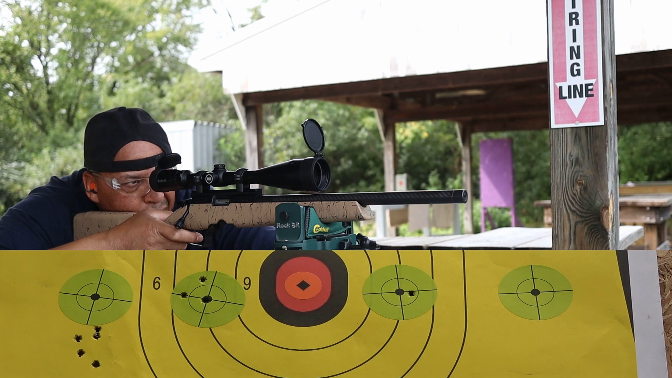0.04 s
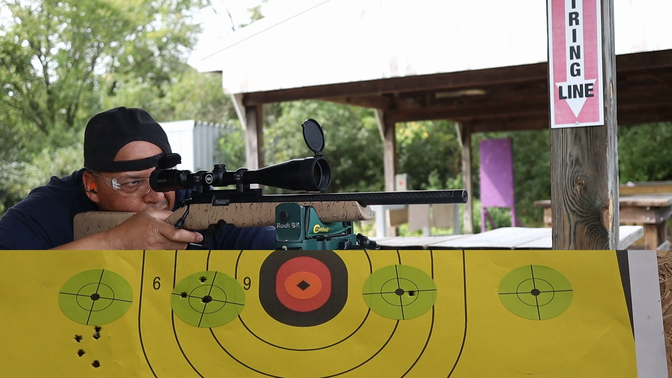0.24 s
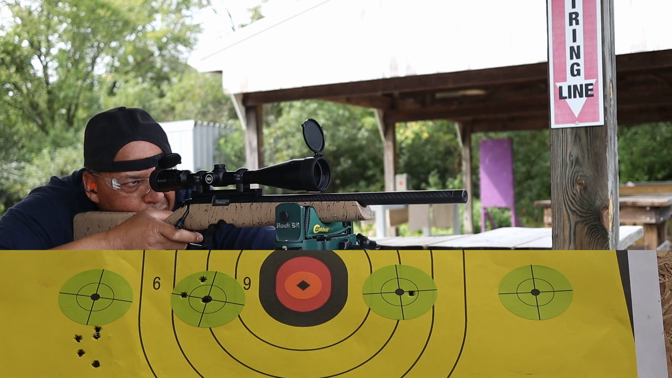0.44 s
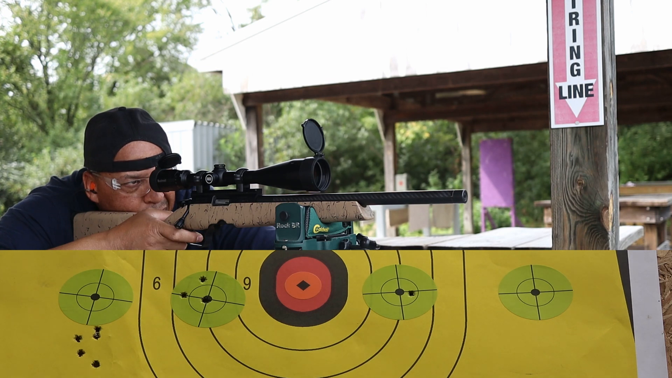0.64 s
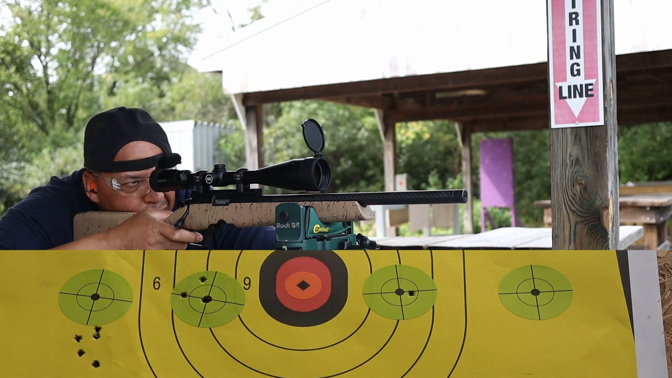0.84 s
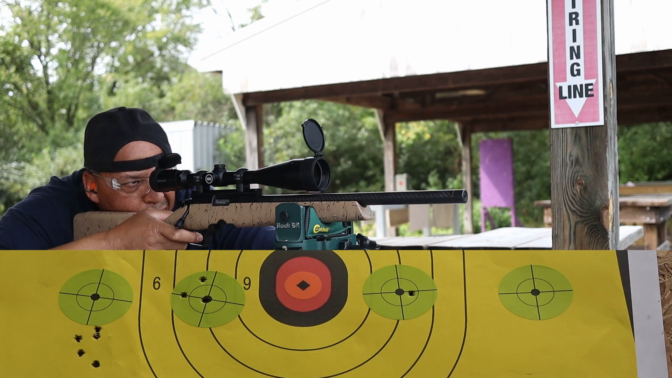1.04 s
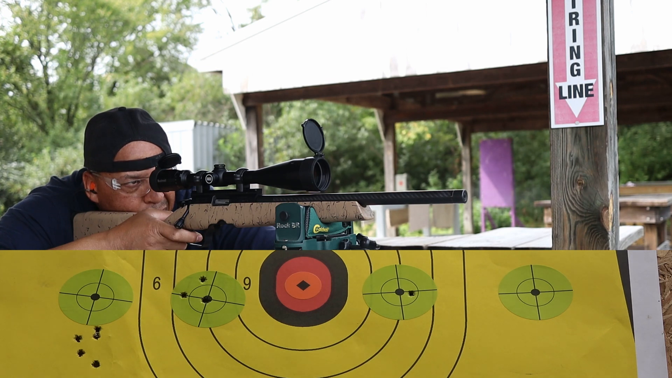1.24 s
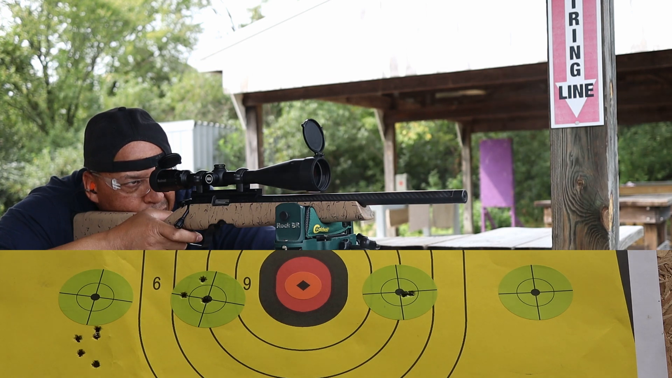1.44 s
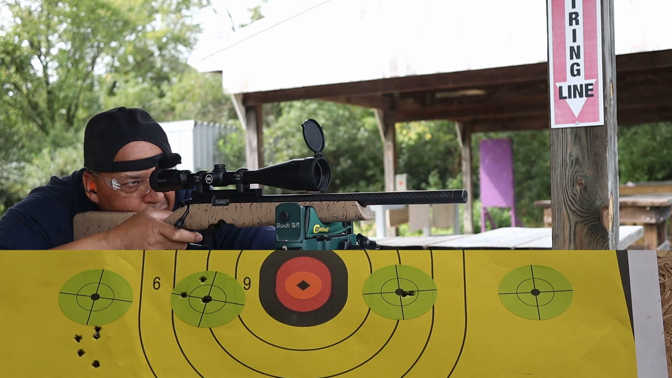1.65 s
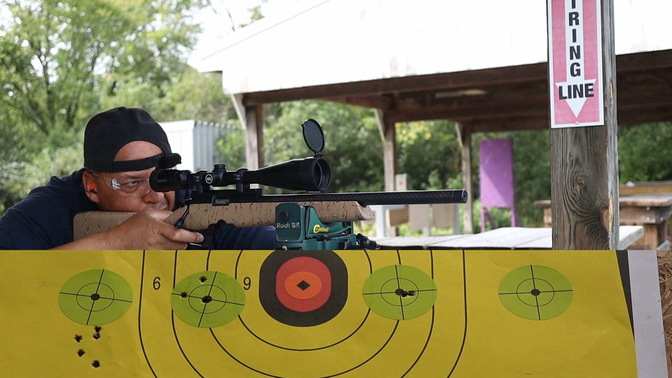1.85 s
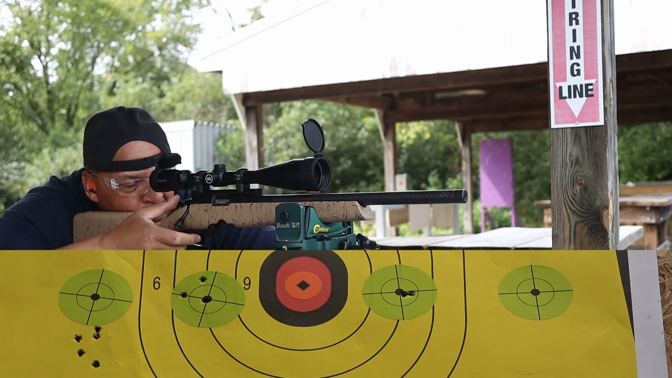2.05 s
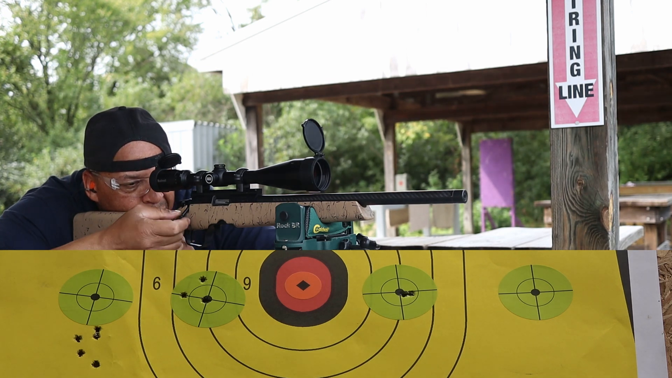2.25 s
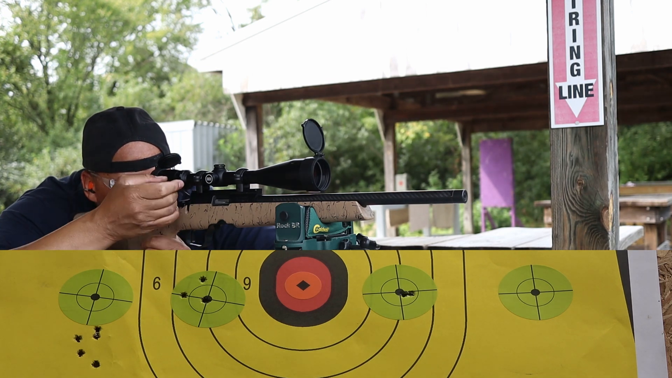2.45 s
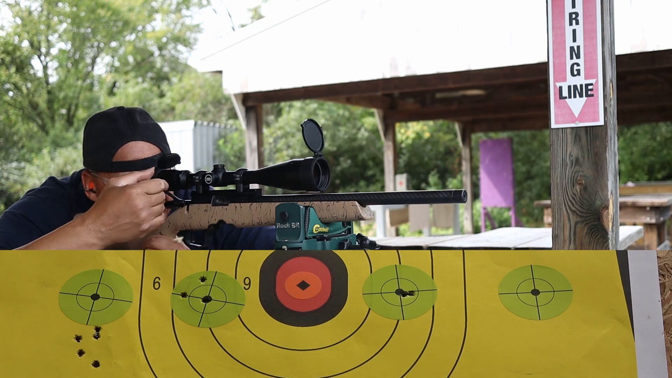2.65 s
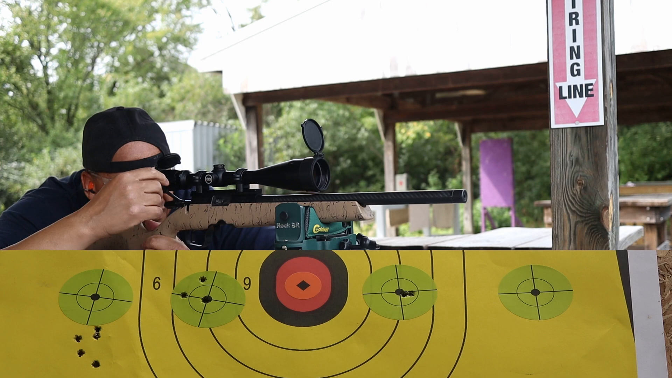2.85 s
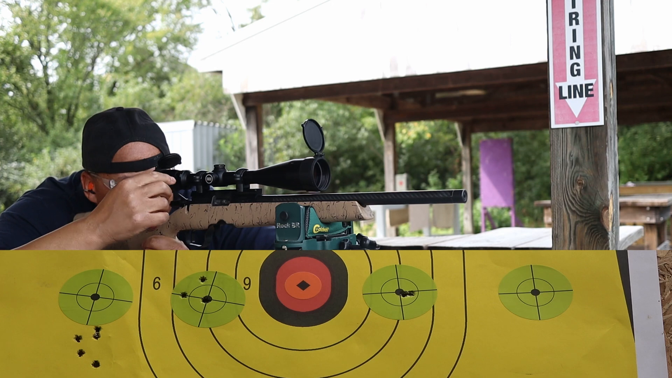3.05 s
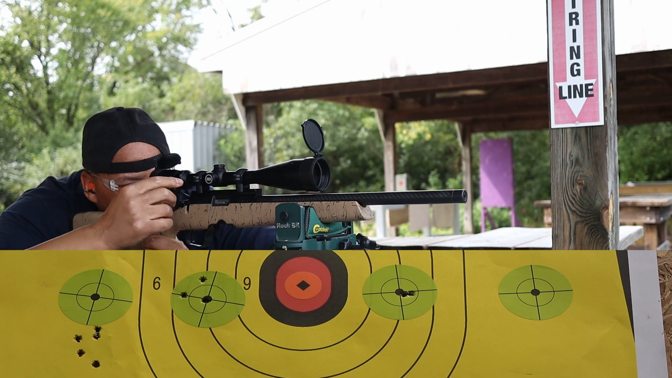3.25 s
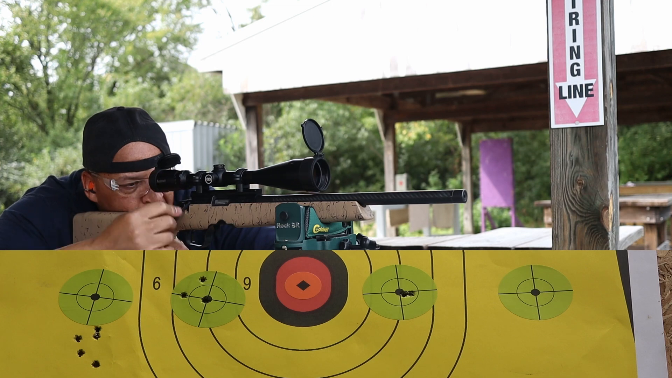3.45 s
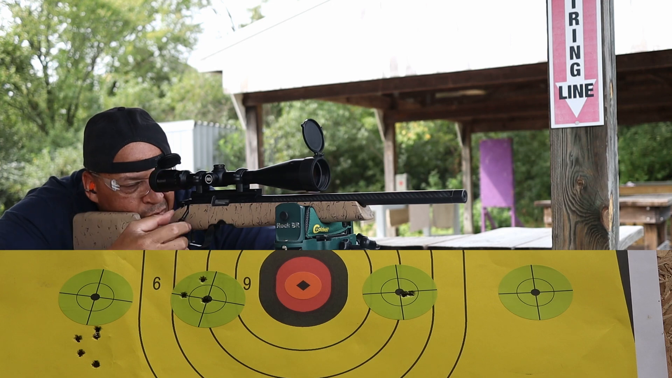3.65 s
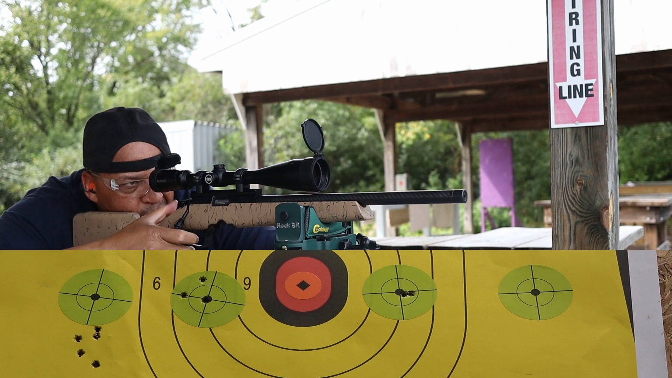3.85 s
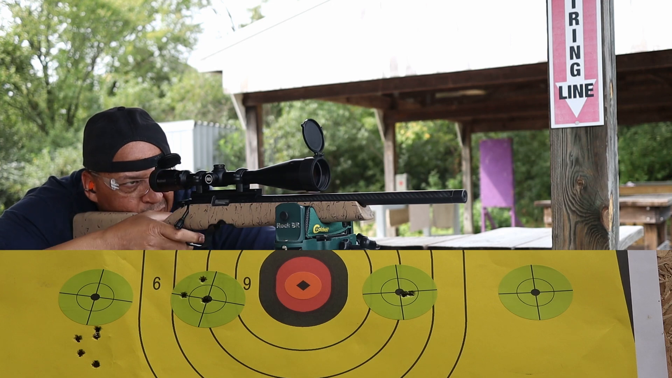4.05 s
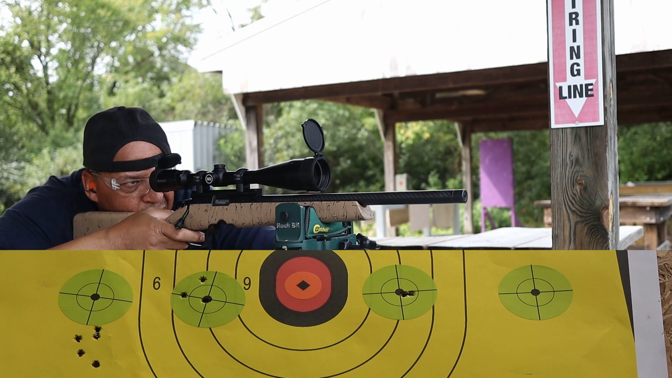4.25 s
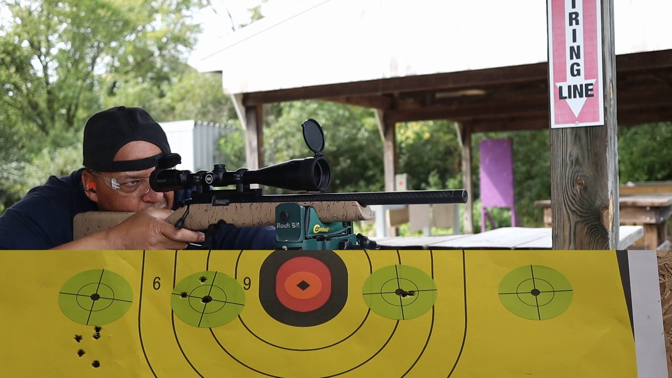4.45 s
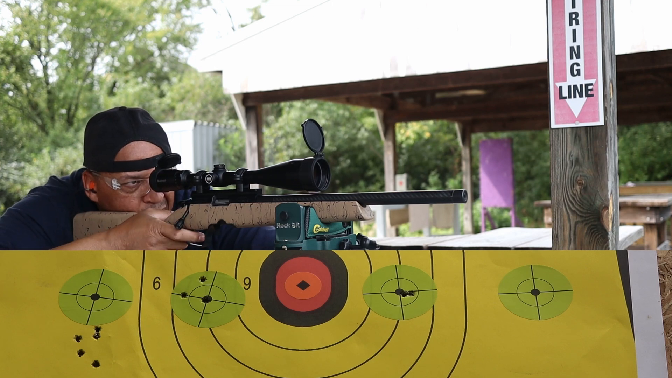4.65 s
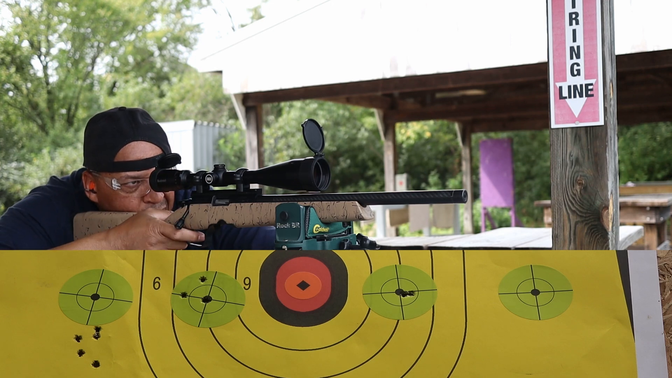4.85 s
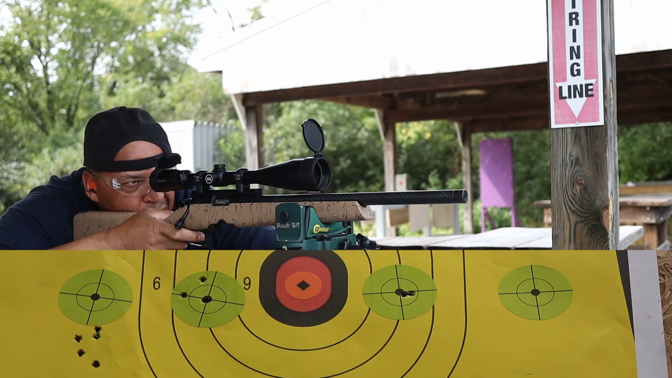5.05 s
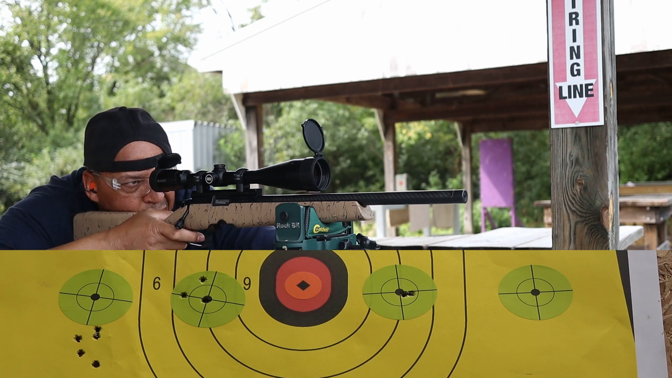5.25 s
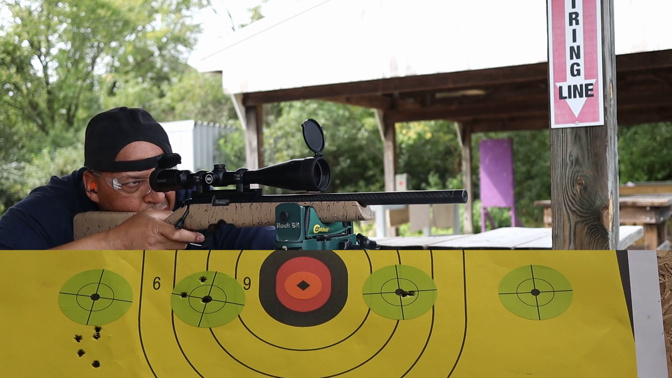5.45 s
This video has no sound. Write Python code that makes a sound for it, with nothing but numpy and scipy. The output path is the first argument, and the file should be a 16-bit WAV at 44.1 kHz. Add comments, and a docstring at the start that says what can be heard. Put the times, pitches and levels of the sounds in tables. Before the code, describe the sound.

After over a second of near silence with distant insects, one sharp, slightly distorted rifle crack bursts close by and decays quickly with a dull roll. A soft impact echo follows at once. Light handling ticks lead to a hard metallic bolt clack, smaller clicks and scrapes, a thin case ring and a woody closing knock. Quiet air, crickets, rustling cloth and faint wind bumps remain, essentially mono.

```python
"""A small-calibre rifle fires once from a bench under an open wooden shelter: swings of pressure, then dying noise.
The bullet strikes downrange as smacks, thumps and scattered echoes. The bolt is lifted, drawn, pushed home and
locked, as knocks, rings and cracks close to the microphone; the spent case rings high as it drops.
Crickets chirp far off in pulsed tones, cloth rustles, the rest creaks, and filtered noise makes the air and a
light wind of lumpy low noise at the single microphone, which overloads on the shot."""
import sys
import numpy as np
from scipy import signal
from scipy.fft import rfft, irfft
from scipy.io import wavfile

SR = 44100
rng = np.random.default_rng(int(sys.argv[2]) if len(sys.argv) > 2 else 0)


def invert_db(level):
    """Linear amplitude ratio for a level in decibels (20 dB per decade), elementwise."""
    return 10 ** (np.asarray(level, dtype=float) / 20)


def unload_wav(signal):
    """Save mono or channel-first audio to the path in sys.argv[1] as 16-bit WAV at rate SR, clipped to [-1, 1]."""
    wavfile.write(
        sys.argv[1],
        SR,
        np.round(np.clip(np.atleast_2d(signal).T, -1, 1) * 32767).astype(np.int16),
    )


N = 242991
T = np.arange(N) / SR


def rms_one(x):
    """Scale to unit rms."""
    return x / np.sqrt(np.mean(x ** 2) + 1e-20)


def peak_one(x):
    """Scale to unit height."""
    return x / np.max(np.abs(x))


def level(rows):
    """Gain along a curve of (time_s, level_db), practically silent outside it."""
    time_s, level_db = np.transpose(rows)
    return invert_db(np.interp(T, time_s, level_db, left=-150, right=-150))


def at_hz(points, hz):
    """Read a table of (pitch_hz, value) on a log frequency axis."""
    table_hz, value = np.transpose(points)
    return np.interp(np.log(np.maximum(hz, 1)), np.log(table_hz), value)


def drift(rate_hz):
    """Slow random curve of rms 1: noise smoothed by two equal poles at rate_hz."""
    step = 40   # samples between computed points
    pole = np.exp(-2 * np.pi * rate_hz * step / SR)
    noise = rng.standard_normal(N // step + 2002)
    slow = signal.lfilter([1], [1, -2 * pole, pole * pole], noise)[2000:]   # settled part
    return np.interp(np.arange(N) / step, np.arange(len(slow)), rms_one(slow))


def coloured(spectrum, size=N):
    """Noise of rms 1 with the given spectrum."""
    gain = invert_db(at_hz(spectrum, np.fft.rfftfreq(size, 1 / SR)))
    return rms_one(irfft(rfft(rng.standard_normal(size)) * gain, size))


def band(x, low_hz, high_hz):
    """Band-pass."""
    sos = signal.butter(2, [low_hz, min(high_hz, .45 * SR)], "band", fs=SR, output="sos")
    return signal.sosfilt(sos, x)


def high_pass(x, hz):
    """Remove what lies below hz."""
    return signal.sosfilt(signal.butter(2, hz, "high", fs=SR, output="sos"), x)


def ring(clicks, hz, t60_s):
    """Damped resonance: a unit click sets a sine of height 1 ringing."""
    r, w = invert_db(-60 / (t60_s * SR)), 2 * np.pi * hz / SR
    return signal.lfilter([0, np.sin(w)], [1, -2 * r * np.cos(w), r * r], clicks + 1e-18)


def dying(t60_s, size=SR):
    """Envelope falling 60 dB in t60_s."""
    return invert_db(-60 * np.arange(size) / SR / t60_s)


def add(out, start_s, sound):
    """Mix a sound in at start_s."""
    i = round(start_s * SR)
    out[i:i + len(sound)] += sound[:N - i]


# Spectrum of the air around the bench: pitch_hz, level_db (relative, per Hz)
AIR_SPECTRUM = [(18, -44.5), (30, -13.5), (130, 0.5), (342, -11.5), (481, -12.5), (1690, -17.5),
                (3600, -17.5), (5000, -16.5), (6000, -25.5), (12300, -23.5), (15600, -33)]


def air():
    """The air is steady coloured noise at -70 dB rms."""
    return invert_db(-70) * coloured(AIR_SPECTRUM)


# Strength of the breeze at the microphone: time_s, level_db
BREEZE = [(0.0, -78), (0.55, -101), (0.83, -73), (0.97, -61), (1.38, -74), (1.58, -61.5), (1.99, -64.5),
          (2.33, -58.5), (2.58, -56), (2.79, -68), (3.07, -66.5), (3.47, -62), (3.9, -68), (4.37, -57.5),
          (4.85, -67.5), (5.51, -67.5)]
# Spectrum of breeze and lumps: pitch_hz, level_db (relative, per Hz)
BREEZE_SPECTRUM = [(12, -42), (20, -10), (81, 3.5), (130, -5), (206, -24.5), (300, -21), (390, -47),
                   (660, -120)]
# Short chance lumps in the low wind noise: middle_s, level_db (rms)
WIND_LUMPS = [(.76, -67.5), (.83, -71), (.91, -60.5), (1.141, -60.5), (1.621, -63), (1.76, -66),
              (1.95, -68), (2.15, -56), (2.23, -52), (2.36, -56.5), (2.48, -61), (2.6, -55.5),
              (2.73, -54.5), (3.19, -62), (3.26, -59.5), (3.38, -59), (3.46, -58), (3.66, -52),
              (3.88, -58.5), (4.0, -55.5), (4.1, -64), (4.191, -58), (4.279, -51.5), (4.36, -59.5),
              (4.46, -57), (4.519, -64), (4.66, -60.5), (4.73, -61.5), (4.85, -66), (5.06, -59),
              (5.25, -66), (5.32, -63)]


def wind():
    """The breeze is low noise of wandering level, with short lumps of noise added to it."""
    out = level(BREEZE) * rms_one(coloured(BREEZE_SPECTRUM) * invert_db(3.0 * drift(12)))
    lump_s = 0.075
    window = np.hanning(round(lump_s * SR))
    low_noise = band(coloured(BREEZE_SPECTRUM), 59, 190)
    for middle_s, level_db in WIND_LUMPS:
        i = round((middle_s - lump_s / 2) * SR)
        lump = rms_one(window * low_noise[i:i + len(window)])
        add(out, i / SR, invert_db(level_db) * lump)
    return out


def wing(hz, pulse_rate):
    """Each wing stroke is a short tone falling in pitch, blurred by distance."""
    cycle = pulse_rate * T + .15 * drift(2)
    pitch_hz = hz * (1 + .022 * np.cos(2 * np.pi * cycle) + .012 * drift(3))
    tone = np.sin(2 * np.pi * np.cumsum(pitch_hz) / SR) * invert_db(3.0 * drift(40))
    blur = .8 * rms_one(ring(rng.standard_normal(N), hz, .009))
    strokes = .35 + np.maximum(0, np.sin(2 * np.pi * cycle))
    return rms_one((tone + blur) * strokes)


# Far crickets, each keeping its own time:
# pitch_hz, level_db (before the chorus gain), pulses_per_s, chirps_per_s, first_chirp_middle_s
SINGERS = [(3650, -79, 27, 3.52, .02), (4480, -79, 26, 2.59, .114), (4750, -80, 28, 2.55, .065),
           (4920, -80, 27, 3.12, .077), (5240, -86, 24, 2.76, .15), (10200, -92, 30, 4.5, .086)]


def crickets():
    """Singers with pulsed tones drift in and out of step over a steady far trill of narrow noise."""
    out = invert_db(-82) * rms_one(band(rng.standard_normal(N), 7300, 8300))
    share, between_chirps = .5, .12   # part of each cycle spent singing; gain left between chirps
    chorus_db, sway_db = 2, 1.5
    for hz, level_db, pulse_rate, chirp_rate, middle_s in SINGERS:
        phase = ((T - middle_s) * chirp_rate + share / 2) % 1 / share
        chirps = between_chirps + np.sin(np.pi * np.minimum(phase, 1)).clip(0) ** .5
        gain = invert_db(chorus_db + level_db + sway_db * drift(0.64))
        out += gain * wing(hz, pulse_rate) * chirps
    return out


# Arm and cloth moving on the bench: time_s, level_db (of the rustle)
SLEEVE_MOVES = [(1.85, -91), (2.05, -62.5), (2.29, -56.5), (2.56, -58.5), (2.7, -69), (2.85, -62.5),
                (3.22, -61.5), (3.37, -71), (3.48, -65.5), (3.87, -67.5), (4.15, -68.5), (4.33, -67),
                (4.55, -86), (4.8, -83.5), (4.93, -63), (5.08, -63), (5.33, -67), (5.45, -84)]


def cloth():
    """Rubbing cloth is a low, uneven rustle of noise with a thin hiss on top."""
    rustle = rms_one(band(rng.standard_normal(N), 200, 597) * invert_db(2.45 * drift(9.6)))
    hiss = rms_one(band(rng.standard_normal(N), 6000, 11600))
    return level(SLEEVE_MOVES) * (rustle + invert_db(-21) * hiss)


# The rest creaking under the stock: pitch_hz, level_db (before the swell), t60_s
CREAK_MODES = [(1976, -65.5, 0.012), (2380, -69.5, .015), (3980, -72, 0.012)]


def squeak():
    """A short rub of noise excites resonances."""
    start_s, length_s = 4.293, .032
    swell = np.sin(np.pi * np.clip((T - start_s) / length_s, 0, 1)).clip(0)
    rub = rng.standard_normal(N)
    modes = sum(invert_db(db) * rms_one(ring(ring(rub, hz, t60), hz, t60)) for hz, db, t60 in CREAK_MODES)
    return swell * modes


# Spent brass case bouncing: start_s, level_db (of the exciting click)
CASE_BOUNCES = [(2.8937, -57), (2.9875, -50.5), (2.9957, -50), (3.6103, -55.5), (3.7894, -68)]
# Modes of the case: pitch_hz, level_db (relative to the click), t60_s
CASE_MODES = [(12270, -3, 0.12), (12440, -19, .2), (12360, -17, 0.16), (4880, 9.5, 0.0089)]


def spent_case():
    """Thin brass rings high after each bounce, close modes beating."""
    clicks = np.zeros(N)
    for start_s, level_db in CASE_BOUNCES:
        clicks[round(start_s * SR)] = invert_db(level_db)
    return band(sum(invert_db(db) * ring(clicks, hz, t60) for hz, db, t60 in CASE_MODES), 3900, 14000)


# Modes of bolt and receiver: pitch_hz, level_db (relative), t60_s
STEEL_MODES = [(2260, 16.5, 0.0063), (2873, 6.5, .012), (3283, 10.5, 0.0083), (3620, -2.5, 0.023),
               (4058, 4, 0.011), (4476, 2, 0.02), (5150, -4, 0.0033)]


def steel(chatter):
    """Rough contact sets every steel mode ringing briefly."""
    return sum(invert_db(db) * ring(chatter, hz, t60) for hz, db, t60 in STEEL_MODES)


HANDLE_HZ, HANDLE_T60_S = 1860, 0.01


def handle(chatter):
    """The bolt handle rings as one damped mode."""
    return ring(chatter, HANDLE_HZ, HANDLE_T60_S)


# Bolt or hand sliding: start_s, end_s, start_level_db, end_level_db
BOLT_SLIDES = [(2.126, 2.201, -59, -66), (2.667, 2.722, -51, -34), (3.05, 3.13, -52, -55),
               (3.328, 3.378, -73, -43), (3.544, 3.654, -63, -63)]


def slides():
    """Sliding metal is a dense rain of small clicks of chance size exciting steel, stock and handle."""
    clicks_per_s, spread_db = 5000, 3
    born = rng.random(N) < clicks_per_s / SR
    size = invert_db(spread_db * rng.exponential(1, N).clip(0, 5))
    grains = born * size * rng.choice([-1, 1], N)
    scrape = rms_one(steel(grains)) + 3.0 * rms_one(ring(grains, 980, 0.01))
    scrape += .6 * rms_one(handle(grains)) + 0.32 * rms_one(band(grains, 5000, 11000))
    gain = sum(level([(a, a_db), (b, b_db)]) for a, b, a_db, b_db in BOLT_SLIDES)
    return gain * rms_one(scrape)


# The loose bolt shivering after a hard blow: pitch_hz, level_db (for a blow of 0 dB), decay_t60_s
SHIVER_MODES = [(3000, -33, 0.21), (3590, -45, 0.25), (4340, -37, 0.33)]


def rattle(clacks):
    """Uneven ringing that grows with the square of the blow."""
    out = np.zeros(N)
    for hz, level_db, t60_s in SHIVER_MODES:
        fading = signal.lfilter([1], [1, -invert_db(-60 / (t60_s * SR))], clacks ** 2 + 1e-18)
        shiver = ring(ring(rng.standard_normal(N), hz, .006), hz, .006)
        out += invert_db(level_db) * fading * rms_one(shiver)
    return out


# The shelter's answer to knock, ring, clack and crack:
# low_hz, high_hz, level_db (relative to the blow), t60_s
SHELTER_ANSWER = [(400, 985, -27.5, 0.16), (1316, 3200, -36, 0.28), (2310, 4400, -37, 0.17),
                  (5360, 9300, -36, 0.1936)]


def answer(jolts):
    """The shelter returns each part of a blow as a band of noise that swells softly and decays."""
    out = np.zeros(N)
    for jolt, (low_hz, high_hz, level_db, t60_s) in zip(jolts, SHELTER_ANSWER):
        fading = signal.lfilter([1], [1, -invert_db(-60 / (t60_s * SR))], jolt + 1e-18)
        swell = signal.lfilter([.01], [1, -.99], fading)
        out += invert_db(level_db) * swell * rms_one(band(rng.standard_normal(N), low_hz, high_hz))
    return out


# Bolt and hand contacts close to the microphone:
# start_s, stock_knock_db, stock_pitch_hz, handle_ring_db, steel_clack_db, crack_db (all peak levels)
BOLT_CONTACTS = [(1.961, -78, 475.4, -72, -52, -77), (2.106, -45.5, 1000, -40.5, -44.5, -57),
                 (2.14, -57, 440, -48.5, -54.5, -52.5), (2.151, -54.5, 438, -54, -44, -56),
                 (2.167, -70, 506, -50, -55, -49), (2.188, -47, 476, -51, -44, -43),
                 (2.325, -45.5, 1217, -53, -55, -70), (2.435, -46.5, 694, -40, -46, -58),
                 (2.445, -32.5, 697, -29.5, -45.5, -58), (2.504, -54, 773, -43, -68, -68),
                 (2.52, -66, 452, -50, -68, -71), (2.552, -47.5, 680, -44, -38, -46),
                 (2.566, -25, 706, -18.5, -23.5, -30), (2.681, -46, 835, -31, -35.5, -48),
                 (2.691, -48, 760, -35, -37, -42), (2.7113, -23, 790, -23, -31.5, -40.5),
                 (2.7204, -19.5, 425, -7, -4, -9.5), (2.892, -32, 490, -24, -35.5, -31.5),
                 (2.986, -52, 402, -70, -47.5, -48), (2.998, -51, 760, -50, -45.5, -56),
                 (3.059, -39.5, 720, -37.5, -54, -49.5), (3.092, -45, 980, -36, -57, -51),
                 (3.115, -41, 593, -46, -59.5, -77), (3.231, -35, 810, -35.5, -43.5, -54),
                 (3.237, -23.5, 720, -57.5, -28, -31.5), (3.243, -29, 816, -20.5, -19.5, -30),
                 (3.318, -51.5, 556, -60, -56, -66), (3.362, -64, 605, -52, -39, -59.5),
                 (3.374, -32, 702, -28, -40, -31.5), (3.38, -28.5, 666, -68, -27, -33.5),
                 (3.471, -46.5, 827, -70.5, -58, -75), (3.571, -35.5, 668, -30.5, -33.5, -59),
                 (3.599, -53, 700, -48, -48, -53), (3.6474, -10.5, 899, -15.5, -29.5, -24),
                 (3.914, -57, 455, -47.5, -60.5, -59), (4.24, -56, 1042, -52, -56, -58),
                 (4.978, -62, 430, -53.5, -51, -68.5)]


def bolt():
    """Each contact knocks the stock, rings handle and steel and cracks; slides, rattle and shelter join in."""
    out, jolts = np.zeros(N), np.zeros((4, N))
    t = T[:4096]
    rise = 1 - np.exp(-t / .002)
    punch, ring_out = dying(.009, size=len(t)), dying(0.029, size=len(t))
    chatter_shape = (1 - np.exp(-t / .001)) * dying(.013, size=len(t))
    for start_s, knock_db, hz, handle_db, clack_db, crack_db in BOLT_CONTACTS:
        rough, spit = rng.standard_normal((2, len(t))) * chatter_shape
        # the harder the blow, the more punch before the wood rings out
        fall = invert_db(knock_db + 24) * punch + ring_out
        modes = np.sin(2 * np.pi * hz * t)
        modes += .25 * np.sin(2 * np.pi * .73 * hz * t) + .2 * np.sin(2 * np.pi * 1.3 * hz * t)
        add(out, start_s, invert_db(knock_db) * peak_one(modes * rise * fall))
        add(out, start_s, invert_db(handle_db) * peak_one(handle(rough)))
        add(out, start_s, invert_db(clack_db) * peak_one(band(steel(rough), 1710, 10000)))
        add(out, start_s, invert_db(crack_db) * peak_one(band(spit, 3900, 11500)))
        jolts[:, round(start_s * SR)] = invert_db([knock_db, handle_db, clack_db, crack_db])
    return out + answer(jolts) + rattle(jolts[2]) + slides()


def burst(level_db, hz, t60_s, rough):
    """A short pressure swing around hz with a share of noisy spit, duller for low swings."""
    t = T[:4096]
    spit = rms_one(band(rng.standard_normal(len(t)), .5 * hz, 2.2 * hz + 1500))
    swing = np.sin(2 * np.pi * hz * t) + rough * spit
    return invert_db(level_db) * swing * (1 - np.exp(-t * hz / 0.22)) * dying(t60_s, size=len(t))


# Bullet strike and its echoes from downrange: start_s, level_db (before rise and decay), pitch_hz, t60_s
STRIKE_BURSTS = [(1.6965, -22, 3030, 0.0073), (1.6990, -18.5, 4150, 0.0047), (1.6994, -20.5, 2448, 0.00534),
                 (1.6989, -22.5, 452, 0.0056), (1.7100, -27.5, 3820, 0.009), (1.7180, -34, 2450, 0.02),
                 (1.7270, -16, 400, 0.0052), (1.7550, -20, 346, 0.0047)]


def strike():
    """Sharp smacks and dull thumps come back from the target, trailing scattered echoes."""
    out = np.zeros(N)
    for start_s, level_db, hz, t60_s in STRIKE_BURSTS:
        add(out, start_s, burst(level_db, hz, t60_s, rough=min(.5, hz / 8000)))
    scatter = rms_one(band(rng.standard_normal(SR), 924, 4150)) * (1 - np.exp(-T[:SR] / 0.0044))
    add(out, STRIKE_BURSTS[0][0], invert_db(-41.5) * scatter * dying(0.41))
    return out


# Decay under the shelter before stretching: pitch_hz, t60_s
SHELTER_DECAY = [(100, .15), (180, 0.34), (300, 0.38), (550, 0.26), (1000, 0.23), (1900, 0.29),
                 (4000, 0.29), (8000, 0.21), (13500, 0.12)]


def shelter_tail(noise, longer):
    """Noise dies band by band as the shelter lets it out, each decay time stretched by longer."""
    edges = 50 * 2 ** np.arange(0, 8.6, .25)
    out = np.zeros(len(noise))
    for k, (low_hz, high_hz) in enumerate(zip(edges, edges[1:])):
        t60_s = longer * at_hz(SHELTER_DECAY, np.sqrt(low_hz * high_hz))
        # alternating signs join neighbouring bands evenly
        out += (-1) ** k * band(noise, low_hz, high_hz) * dying(t60_s)
    return out


# Striker jolt through the stock, muzzle crack, gas blast, bench slap:
# start_s, level_db (before rise and decay), pitch_hz, t60_s
REPORT_BURSTS = [(1.4254, -1.5, 460, 0.05), (1.4293, 3.5, 4160, 0.012), (1.4322, 2, 420, 0.018),
                 (1.4389, -1.5, 295, 0.029)]
# Spectrum of the report scattered by the shelter: pitch_hz, level_db (relative, per Hz)
REPORT_SPECTRUM = [(35, -60), (60, -30), (167, -16), (248, -3.5), (279, -9), (336, -3.5), (404, -2.5),
                   (741, -3.5), (852, -5.5), (2540, -14.5), (11000, -24), (14500, -26.5), (16500, -45)]


def shot():
    """Pressure bursts, dense early scatter, the shelter's tail and a dull roll from the trees."""
    out = np.zeros(N)
    for start_s, level_db, hz, t60_s in REPORT_BURSTS:
        add(out, start_s, burst(level_db, hz, t60_s, rough=0.19))
    crack_s = REPORT_BURSTS[1][0]
    rise = 1 - np.exp(-T[:SR] / 0.0012)
    early = coloured(REPORT_SPECTRUM, size=SR) * dying(0.041)
    late = shelter_tail(coloured(REPORT_SPECTRUM, size=SR), longer=1.15)
    roll = rms_one(band(rng.standard_normal(SR), 110, 900)) * dying(1.4)
    add(out, crack_s, rise * (invert_db(5) * early + invert_db(-10.5) * late + invert_db(-42.5) * roll))
    return out


def scene():
    """All sources at one microphone, the same in both channels."""
    background = air() + wind() + crickets() + cloth() + squeak()
    rifle = spent_case() + high_pass(bolt(), 190) + high_pass(shot() + strike(), 95)
    mono = background + rifle
    return np.stack([mono, mono])


def roll_off(x):
    """The treble ends steeply here."""
    return signal.sosfilt(signal.butter(12, 15760, fs=SR, output="sos"), x)


def record(dry):
    """Hard overload clips the peaks; a faint, smeared and brighter copy sets the two channels apart."""
    loud = np.clip(dry, -.97, .97)
    smear = signal.lfilter([1, -.6], [1], rng.standard_normal(512) * dying(.008, size=512))
    smear /= np.sqrt(np.sum(smear ** 2))
    apart = invert_db(-31) * signal.fftconvolve(loud[0], smear)[:N]
    return roll_off(loud + apart * [[1], [-1]])


dry = scene()
out = record(dry)
unload_wav(out)
```